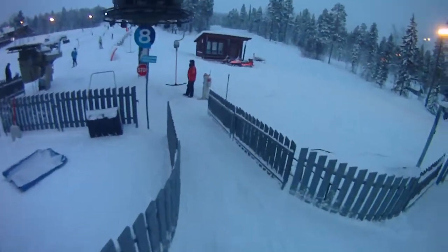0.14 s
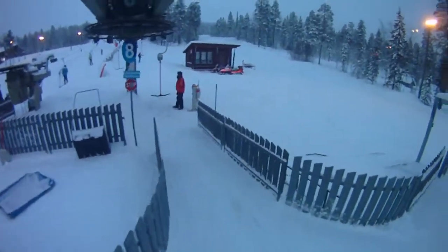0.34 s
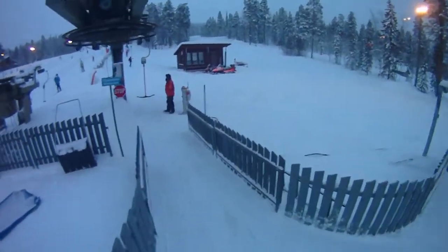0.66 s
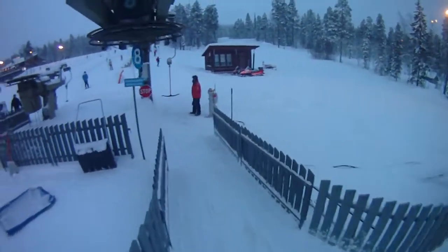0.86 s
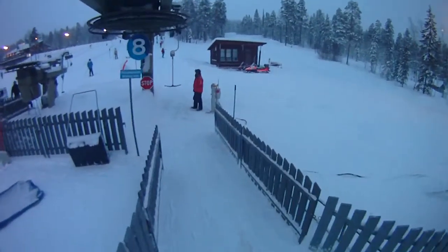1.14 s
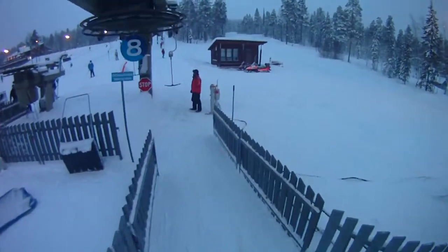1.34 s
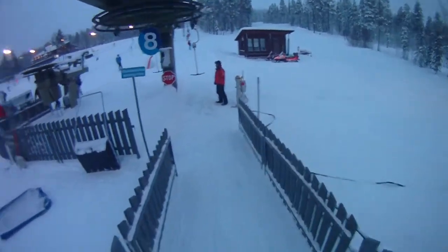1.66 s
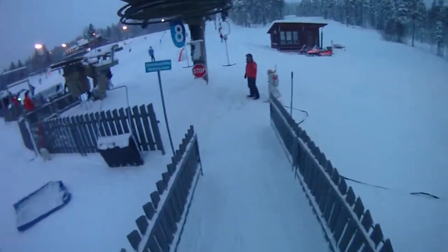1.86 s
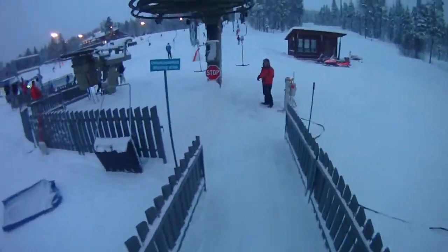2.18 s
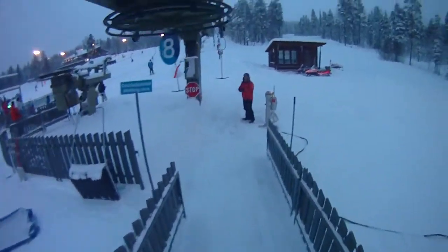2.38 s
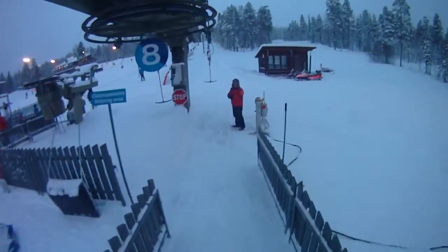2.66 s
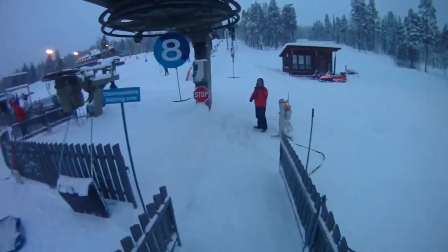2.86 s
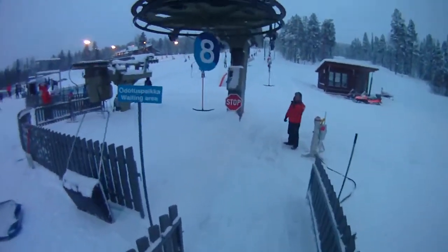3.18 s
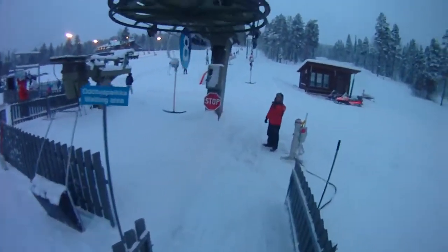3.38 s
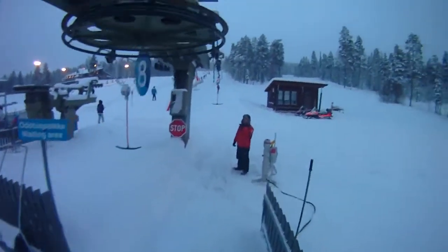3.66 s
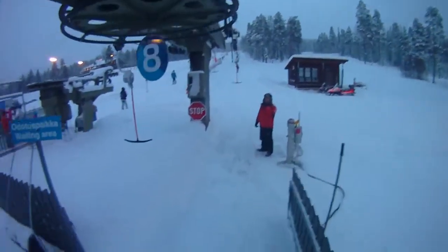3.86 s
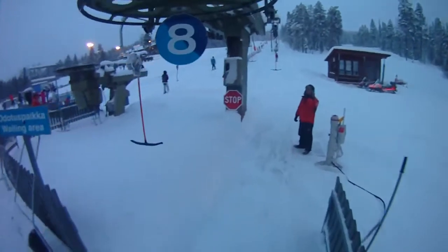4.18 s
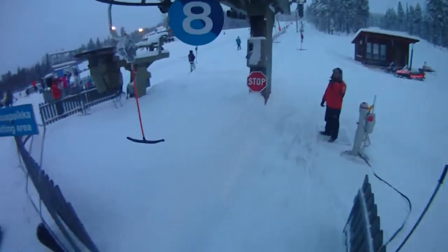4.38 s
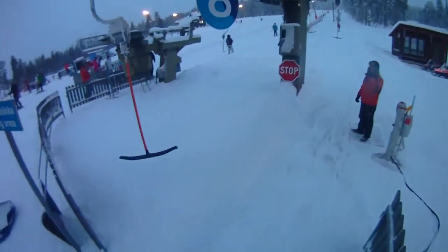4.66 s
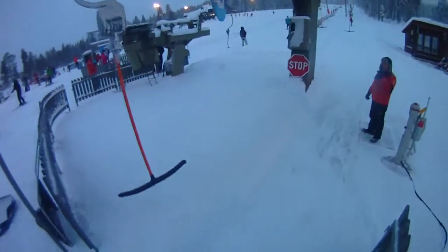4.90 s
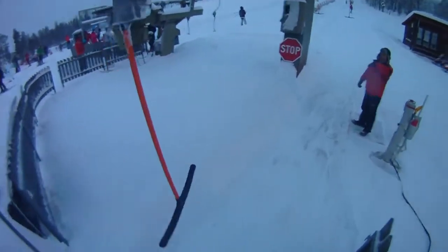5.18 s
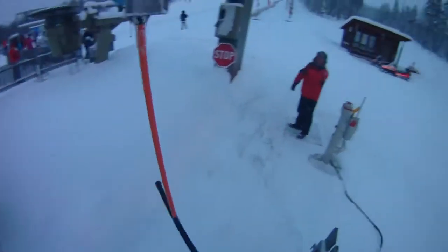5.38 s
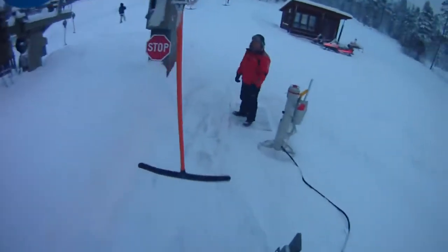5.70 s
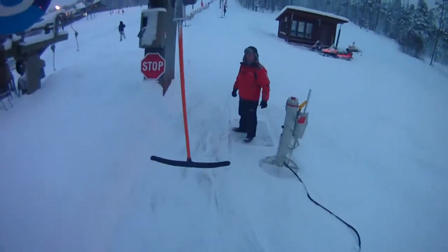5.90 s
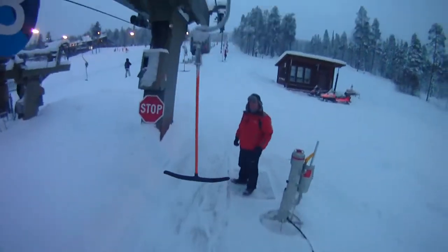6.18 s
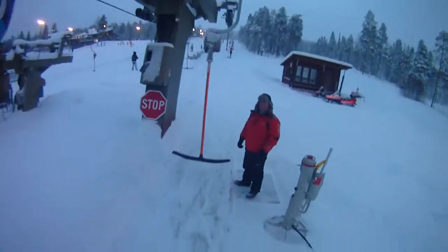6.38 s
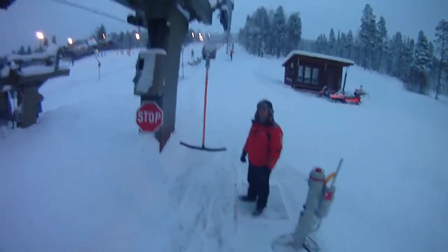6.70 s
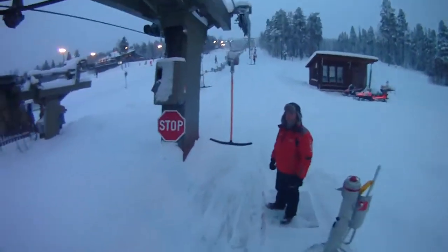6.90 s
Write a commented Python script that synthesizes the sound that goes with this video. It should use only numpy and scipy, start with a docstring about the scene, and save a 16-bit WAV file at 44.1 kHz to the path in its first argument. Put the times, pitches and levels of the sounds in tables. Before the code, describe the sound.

Outdoors on a snowy slope, a microphone worn by a gliding skier approaches a drag lift station. Gear hum, ringing steel rattle, roar and hiss grow steadily, with small knocks. Dull snow scuffs come early, then sharp ticks, one extremely loud just before four seconds. A hanger clacks, the machine peaks near six seconds, and a short run of squeaks on cold snow follows as it begins to ease.

```python
"""Skiing past a drag lift's drive station

Gliding past on skis: each part of the station swells as it nears and fades behind, with the structure between.
Wavering harmonics make the gear drive's hum, small contacts ring steel resonances as rope and wheel rattle,
and shaped noise makes rumble, roar and a machine hiss that changes colour on the way. Filtered noise makes
scuffs, crunches and squeaks of snow, a low groan and a soft rumble; sharp ticks sound at the microphone."""
import sys
import numpy as np
from scipy import signal
from scipy.fft import rfft, irfft, next_fast_len
from scipy.io import wavfile

SR = 44100
rng = np.random.default_rng(int(sys.argv[2]) if len(sys.argv) > 2 else 0)


def to_wav(sig):
    """Store sig (one row per channel, or 1-D mono) as 16-bit WAV at the path in sys.argv[1].

    Samples outside -1..1 are clipped; the rate is SR.
    """
    pcm = np.clip(np.atleast_2d(sig), -1, 1) * 32767
    pcm = np.round(pcm).astype(np.int16)
    wavfile.write(sys.argv[1], SR, pcm.T)  # frames by channels


N = 310884
TIME = np.arange(N) / SR  # seconds


def from_db(db):
    """Decibels to gain."""
    return 10 ** (np.asarray(db) / 20)


def rms_one(x):
    """Scale to unit rms."""
    return x / np.sqrt(np.mean(x ** 2) + 1e-20)


def drift(rate_hz):
    """Slow random wander of rms 1: white noise through two equal low-pass poles at the given rate."""
    hop = 40  # samples from one slow value to the next
    warm_up = 2000  # slow values dropped while the filter settles
    pole = np.exp(-2 * np.pi * rate_hz * hop / SR)
    white = rng.standard_normal(N // hop + 2 + warm_up)
    slow = signal.lfilter([1], [1, -2 * pole, pole ** 2], white)[warm_up:]
    return np.interp(np.arange(N) / hop, np.arange(len(slow)), rms_one(slow))


def noise(spectrum):
    """Noise of a given colour, dying away beyond its ends; rms 1."""
    hz, db = np.transpose(spectrum)
    size = next_fast_len(N)
    bins = np.maximum(np.fft.rfftfreq(size, 1 / SR), 1)
    gain = from_db(np.interp(np.log(bins), np.log(hz), db))
    gain *= np.minimum(bins / hz[0], 1) ** 2 * np.minimum(hz[-1] / bins, 1) ** 2
    return rms_one(irfft(gain * rfft(rng.standard_normal(size)), size)[:N])


def resonate(x, hz, width_hz):
    """One resonance, a pole pair whose gain is about 1 on top."""
    r = np.exp(-np.pi * width_hz / SR)
    zeros = np.array([1, 0, -1]) * (1 - r * r) / 2
    poles = [1, -2 * r * np.cos(2 * np.pi * hz / SR), r * r]
    return signal.lfilter(zeros, poles, x + 1e-18)


def band_noise(hz, width_hz, size=N):
    """Noise through the same resonance twice, for steep flanks; rms 1."""
    single_hz = width_hz * 1.55  # each pass is wider, so that the pair has the given width
    once = resonate(rng.standard_normal(size), hz, single_hz)
    return rms_one(resonate(once, hz, single_hz))


def contacts(per_s, spread_db):
    """Random small impacts of uneven strength and either sign."""
    sizes = from_db(spread_db * np.minimum(rng.exponential(1, N), 4)) * rng.choice([-1, 1], N)
    return sizes * (rng.random(N) < per_s / SR)


def tone(cycles, order, waver_db, waver_hz, smear_rad):
    """A harmonic whose level and phase waver as the sound paths shift; rms 1."""
    phase = 2 * np.pi * (order * cycles + rng.random()) + smear_rad * drift(waver_hz)
    return rms_one(np.sin(phase) * from_db(waver_db * drift(waver_hz)))


def step(s, turning_s):
    """A smooth change from 0 to 1 around a moment."""
    return .5 + .5 * np.tanh((TIME - s) / (2 * turning_s))


def swell(s, length_s):
    """A smooth rise to 1 and back around a moment."""
    return np.exp(-(2 * (TIME - s) / length_s) ** 2)


def passing(part):
    """Level in dB of a part passed at steady speed: one over distance, with a change once screened."""
    # Each part of the station: closest at in seconds, level there in dB before screening, time from there
    # to fall 3 dB in seconds, screened from in seconds, screening loss in dB (negative is a gain).
    station_parts = { "mesh tone": (6, -61, 0.56, 6.5, 1), "second harmonic": (5, -64.5, 1.06, 5, 4),
                     "third harmonic": (5.5, -54.5, 1.15, 5.5, 4.5),
                     "middle harmonics": (4, -66, 1, 7.5, -1.5), "ninth harmonic": (5, -60, 2, 2, 0.5),
                     "motor": (7, -69, 0.5, 7.0, -3), "rumble": (7, -62, 4.5, 7.0, -2),
                     "roar": (4.5, -52.5, 4, 5.5, 1.2), "wheel": (6.0, -47.5, 1.74, 6.5, 2.5),
                     "wheel rim": (6.5, -53, 0.06, 7.0, 3), "frame": (4.5, -52, 4.0, 5.5, 13.5),
                     "hiss": (5, -51, 2.5, 6, 6), }
    closest_s, db, reach_s, screened_s, loss_db = station_parts[part]
    distance_db = 10 * np.log10(1 + ((TIME - closest_s) / reach_s) ** 2)
    return db - distance_db - loss_db * step(screened_s, turning_s=.12)


def gear_level(part, order):
    """Gain of one gear harmonic: its pass with its swells and fades."""
    # Single gear tones swell or fade on the way.
    # Each row: centre in seconds, length in seconds, change in dB, number of the harmonic.
    tone_swells = [(0.14, 0.51, -5, 1), (1.7, 1.9, 4, 1), (3.65, .8, -9, 1), (1.0, .5, -5, 3),
                   (4.5, .25, 1, 3), (6.45, 0.73, -5, 3), (0.84, .5, -2, 9), (2.46, 0.32, 10.5, 9),
                   (4.876, 0.23, 8, 9), (5.9, 0.43, 6.5, 9)]
    change_db = sum(db * swell(s, length) for s, length, db, k in tone_swells if k == order)
    return from_db(passing(part) + change_db)


def drive():
    """Harmonics of the gear mesh on one slightly unsteady speed, and the motor's electric hum."""
    # Middle gear harmonics. Each row: multiple of the mesh tone, level in dB re their shared pass.
    gear_orders = [(4, -7), (5, -0.5), (6, 4), (7, -3.5)]
    # Steady motor tones. Each row: frequency in Hz, level in dB re the motor's pass.
    motor_tones = [(100, -18.5), (200, 0), (300, 0), (600, 4)]
    mesh_hz = 185.25 * (1 + .0008 * drift(2.5))
    cycles = np.cumsum(mesh_hz) / SR
    third = gear_level("third harmonic", order=3)
    out = gear_level("mesh tone", order=1) * tone(cycles, 1, waver_db=1.8, waver_hz=3.1, smear_rad=0.16)
    out += gear_level("second harmonic", order=2) * tone(cycles, 2, waver_db=2.0, waver_hz=3.1, smear_rad=0.39)
    out += third * tone(cycles, 3, waver_db=1.7, waver_hz=6.5, smear_rad=0.82)
    out += gear_level("ninth harmonic", order=9) * tone(cycles, 9, waver_db=6.5, waver_hz=12, smear_rad=0.5)
    middle_db, motor_db = passing("middle harmonics"), passing("motor")
    for order, db in gear_orders:
        out += from_db(middle_db + db) * tone(cycles, order, waver_db=3.0, waver_hz=6.1, smear_rad=0.345)
    for hz, db in motor_tones:
        out += from_db(motor_db + db) * tone(hz * TIME, 1, waver_db=-4.0, waver_hz=2.02, smear_rad=0.17)
    # uneven teeth spread a rough skirt round the strongest harmonic
    return out + third * from_db(-5.0) * band_noise(561.3, 52)


def wheel(rattle_db):
    """The rope grinds through the wheel: dense small contacts and a few knocks ring the same modes."""
    # Each row: frequency in Hz, width in Hz, level in dB ahead of the broad resonance over them all.
    wheel_modes = [(1456, 34, -23), (1590, 70, 5.5), (1663.6, 36, 10.5), (1745, 80, -28.5), (1870, 56, -19)]
    # Each row: moment in seconds, peak level in dB.
    knock_rows = [(.3353, -39), (.521, -35.5), (1.044, -41), (1.594, -37.5), (2.354, -36), (3.406, -34),
                  (5.6654, -35), (5.9964, -36), (6.848, -36)]

    def ring(x):
        modes = sum(from_db(db) * resonate(x, hz, width) for hz, width, db in wheel_modes)
        return resonate(modes, 1594, 800)

    rattle = rms_one(ring(contacts(per_s=1000, spread_db=1.3)))
    rattle *= from_db(rattle_db + 1.2 * drift(3.4))
    blows = np.zeros(N)
    for s, db in knock_rows:
        blows[int(s * SR)] = from_db(db)
    one_blow_peak = np.abs(ring(signal.unit_impulse(SR // 10))).max()
    return rattle + ring(blows) / one_blow_peak


def wheel_rim():
    """A brighter rattle of the rim: a band of noise, heard only close to the wheel."""
    return from_db(passing("wheel rim") + 1.5 * drift(12)) * band_noise(1710, 130)


def frame(ring_db):
    """The steel frame sings along in its own resonances, each surging by itself."""
    # Each row: frequency in Hz, width in Hz, level in dB re the other modes' scale.
    frame_modes = [(1074, 87, -5), (1182, 24, -6), (1238, 26, 4.5), (1316, 70, -7), (1395, 73, -0.5),
                   (2236, 124, -9), (2402, 86, -2.5)]
    singing = np.zeros(N)
    for hz, width, db in frame_modes:
        mode = resonate(contacts(per_s=3000, spread_db=0.0), hz, width)
        singing += from_db(db + 1.12 * drift(3.8)) * mode
    band = signal.butter(8, [800, 2550], "band", fs=SR, output="sos")
    return from_db(ring_db) * rms_one(signal.sosfilt(band, singing))


def hangers():
    """A loose hanger clacks: a sudden clatter of band noise that dies away exponentially."""
    # Each row: start in seconds, level in dB, decay in seconds, centre in Hz, width in Hz.
    clack_rows = [(4.705, -32.5, 0.0064, 1290, 680), (4.908, -47, 0.0052, 1540, 700),
                  (6.733, -43.5, .0045, 4540, 2730), (6.736, -43.5, 0.016, 1590, 300)]
    out, age = np.zeros(N), TIME[:SR // 10]
    for s, db, decay, hz, width in clack_rows:
        at = round(s * SR)
        clatter = np.exp(-age / decay) * band_noise(hz, width, size=len(age))
        out[at:at + len(age)] += from_db(db) * clatter
    return out


def hiss(hiss_db):
    """Machine hiss; its colour shifts as the station passes overhead, and each resonance wavers."""
    # Colours far off, approaching, under the wheel and past it.
    # Each row of a colour: frequency in Hz, relative level in dB per Hz.
    colours = [[(2000, -21), (2600, -4), (2880, -2), (3350, -6), (4400, -3), (5300, -8), (6470, 4.5),
                (6750, 1.5), (7450, -9.5), (8900, -8), (9650, -15.5), (10500, -15), (11500, -21.5),
                (15300, -22)], [(2000, -28), (2600, -8), (2880, -3), (3300, -8.5), (4650, -0.5),
                                  (5300, -6), (6470, -0.5), (6900, -3.5), (7450, -10.5), (8600, -10.5),
                                  (9400, -16.5), (10500, -17.5), (11500, -25.5), (15300, -26.5)], [(2200, -31.5), (2650, -12.5), (2930, -4.5),
                                                         (3200, -8), (3630, -5.5), (4090, -17),
                                                         (4500, -4.5), (6190, -4), (6750, -3.5),
                                                         (7350, -20), (8210, -9.5), (9310, -19.5),
                                                         (12000, -27), (15300, -36)], [(2000, -48), (2600, -10.5),
                                                                             (2970, -11), (3400, -8.5),
                                                                             (4400, -8), (5200, -9.5),
                                                                             (6000, -6.5), (6700, -9.5),
                                                                             (7500, -18.5), (8100, -15.5),
                                                                             (9600, -19.5), (11500, -28.5),
                                                                             (15300, -31)]]
    # Turns from each colour to the next. Each row: middle in seconds, turning time in seconds.
    hiss_turns = [(1.65, 0.52), (4.35, 0.21), (5.5, 0.23)]
    # Resonances and thin whistles. Each row: frequency in Hz, width in Hz, level in dB re the hiss,
    # stage where heard (0 far to 3 past; a stage below that range is silent).
    hiss_peaks = [(4420, 510, -9, 0), (6490, 200, 1, -2), (4190, 17, -19, 2), (6400, 320, -9.5, 1),
                  (3660, 300, -11.5, 2), (6080, 540, -3.5, 2), (2970, 210, -9, 3), (7840, 13, -24, 3)]
    stage = sum(step(s, turning_s) for s, turning_s in hiss_turns)

    def share(where):
        return np.sqrt(np.clip(1 - np.abs(stage - where), 0, 1))

    out = sum(share(k) * noise(colour) for k, colour in enumerate(colours))
    for hz, width, db, where in hiss_peaks:
        out += share(where) * from_db(db + 4.0 * drift(3.5)) * band_noise(hz, width)
    return from_db(hiss_db + .5 * drift(23)) * out


def snow_and_low_sounds():
    """Low-passed grains make dull scuffs, a low groan and a soft rumble; band noise, crisp crunches."""
    # Scuffs of packed snow, with a soft rumble at 1.78 s and a low groan at 6.33 s.
    # Each row: centre in seconds, length in seconds, level in dB, top frequency in Hz.
    dull_rows = [(.08, 0.13, -58.5, 800), (0.62, 0.034, -58.5, 660), (0.775, 0.11, -58, 500),
                 (0.91, .11, -57, 438), (1.236, .17, -54.5, 597), (1.227, 0.023, -53, 493),
                 (1.433, 0.066, -54, 760), (1.469, 0.02, -52, 1000), (1.78, 0.3, -66, 420),
                 (6.33, 0.11, -60.5, 320)]
    # Crunches and scrapes of snow under the skis. Each row: centre in seconds, length in seconds,
    # level in dB, centre in Hz, width in Hz.
    crunch_rows = [(.906, 0.0026, -58, 12000, 2500), (0.92, 0.002, -53.5, 8000, 5000),
                   (1.533, 0.027, -53.5, 3800, 2500), (5.734, 0.026, -62, 8800, 600),
                   (5.895, 0.016, -59, 8850, 503)]
    out = np.zeros(N)
    grains = rng.standard_normal(N) * from_db(1.0 * drift(90))
    grains = signal.sosfilt(signal.butter(2, 215, "high", fs=SR, output="sos"), grains)
    for s, length, db, top_hz in dull_rows:
        low_pass = signal.butter(4, top_hz, fs=SR, output="sos")
        dull = rms_one(signal.sosfilt(low_pass, grains))
        flat_topped = np.exp(-.5 * (2 * (TIME - s) / length) ** 4)
        out += from_db(db) * flat_topped * dull
    for s, length, db, hz, width in crunch_rows:
        out += from_db(db) * np.exp(-2 * ((TIME - s) / length) ** 2) * band_noise(hz, width)
    return out


def squeaks(count):
    """Cold snow sticks and slips under a braking ski in one even run, each slip a short squeak."""
    start_s, every_s, length_s = 6.118, 0.086, 0.048
    slips = np.zeros(N)
    for k in range(count):
        since_slip = TIME - start_s - k * every_s
        slips += np.exp(-2 * (since_slip / length_s) ** 2)
    return from_db(-54.5) * slips * band_noise(1000, 130)


def ticks():
    """Dry ticks at the microphone: a broad snap and a bright ring that is over within a millisecond."""
    # Each row: start in seconds, peak of the ring in dB, its centre in Hz, its width in Hz,
    # peak of the broad snap in dB re the ring.
    tick_rows = [(0.8662, -35, 5660, 5000, -14), (2.4770, -52, 13000, 5000, -14),
                 (3.2180, -46, 10000, 6000, -12), (3.3610, -28.5, 4300, 5000, -10),
                 (3.8814, 0, 7930, 3300, -2), (4.5872, -27, 12000, 5000, -16),
                 (4.5920, -20.5, 6360, 5000, 8)]
    out, kick = np.zeros(N), signal.unit_impulse(SR // 100)
    snap = resonate(kick, 2530, 6980)
    snap /= np.abs(snap).max()
    for s, db, hz, width, snap_db in tick_rows:
        ring = resonate(resonate(kick, hz, width), hz, width)
        ring /= np.abs(ring).max()
        at = round(s * SR)
        out[at:at + len(kick)] -= from_db(db) * (ring + from_db(snap_db) * snap)
    return out


def roar(surge_db):
    """The station's roar: noise of one broad colour with a quick waver in level."""
    # Each row: frequency in Hz, relative level in dB per Hz.
    roar_colour = [(300, -36), (450, -4.5), (560, -3.5), (680, -3), (900, 0), (1100, -1), (1400, 0.5),
                   (1650, 0), (1830, -10.5), (1950, 1), (2100, -8.5), (2650, -21), (4000, -40)]
    return from_db(passing("roar") + surge_db + 1.4 * drift(10)) * noise(roar_colour)


def rumble():
    """The low bed of the station: deep noise that follows its pass alone."""
    # Each row: frequency in Hz, relative level in dB per Hz.
    rumble_colour = [(20, -30), (50, -18.5), (75, -13), (97, -7.5), (120, -9), (142, -13.5), (195, -4.5),
                     (230, -5), (300, -0.5), (380, -2), (500, -4), (650, -10)]
    return from_db(passing("rumble")) * noise(rumble_colour)


def scene():
    """All sources meet at one microphone, heard alike in both channels."""
    # The running noise surges or sinks. Each row: centre in seconds, length in seconds,
    # then the change of wheel, frame, hiss and roar in dB.
    surge_rows = [(.85, 0.92, 3, 0.5, 0.5, -2.5), (1.853, 0.98, 0.5, 1, 1, 0.5), (2.377, .1, 6, 1, 1, -0.5),
                  (3.336, 0.28, 1.5, 0.5, 1, .5), (3.75, 0.39, -1, -1.5, -1.2, -1.5),
                  (4.537, 0.087, 3, 2.5, 1, 0), (6.042, 0.66, 1, -0.5, -1.5, 0)]
    surges_db = sum(np.outer(gains_db, swell(s, length)) for s, length, *gains_db in surge_rows)
    wheel_db, frame_db, hiss_db, roar_db = surges_db
    lift = drive() + wheel(passing("wheel") + wheel_db) + wheel_rim()
    lift += frame(passing("frame") + frame_db) + hangers()
    lift += hiss(passing("hiss") + hiss_db) + roar(roar_db) + rumble()
    mono = lift + snow_and_low_sounds() + squeaks(count=4) + ticks()
    return np.array([mono, mono])


def record(dry):
    """The loudest tick overloads and clips; then a steep low-pass cuts the top, 60 dB down by 15.8 kHz."""
    top_cut = signal.cheby2(18, 60, 15800, fs=SR, output="sos")
    return signal.sosfilt(top_cut, np.clip(dry, -1, 1))


dry = scene()
out = record(dry)
to_wav(out)
```